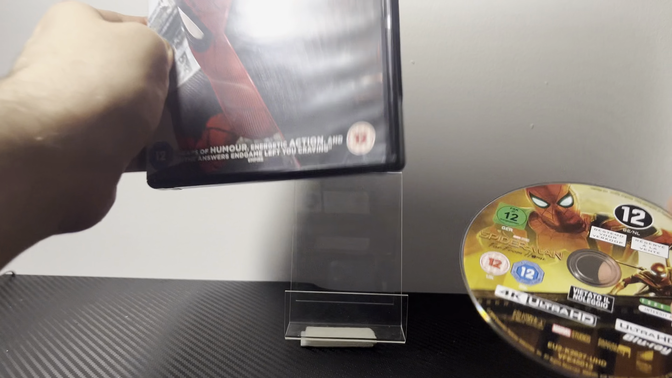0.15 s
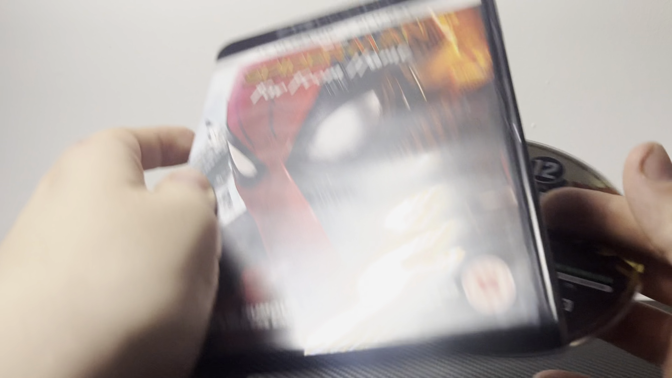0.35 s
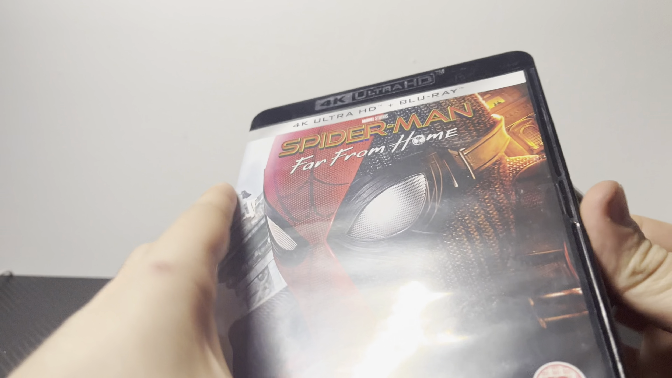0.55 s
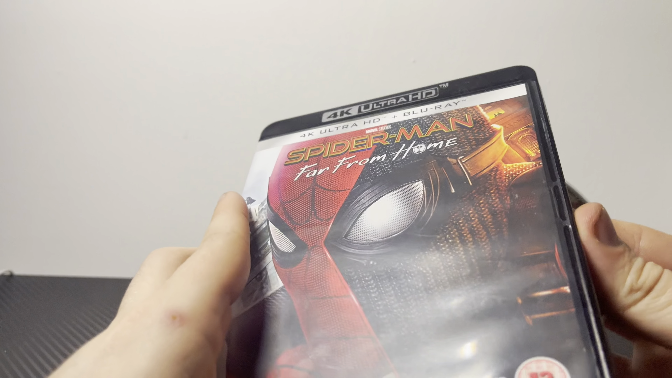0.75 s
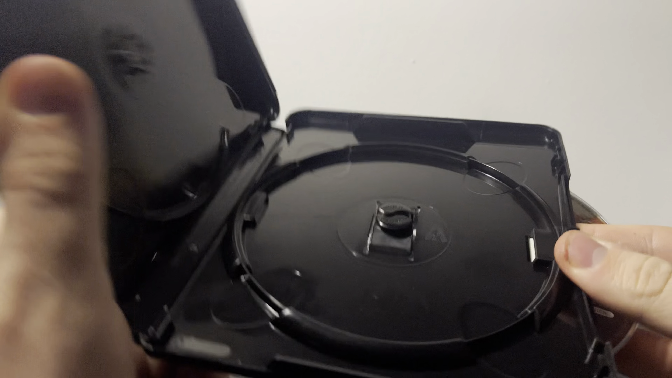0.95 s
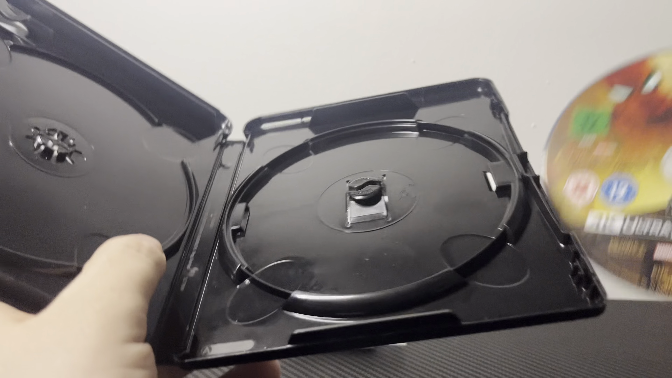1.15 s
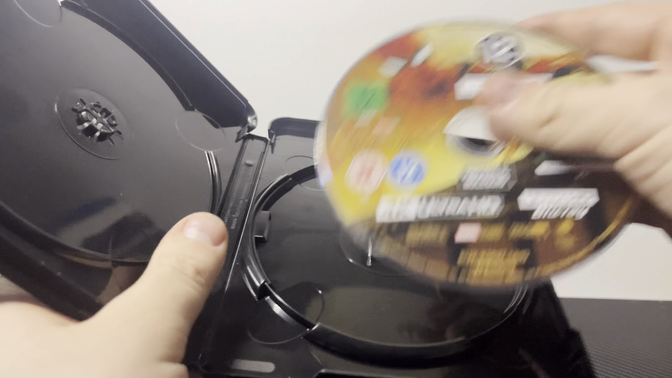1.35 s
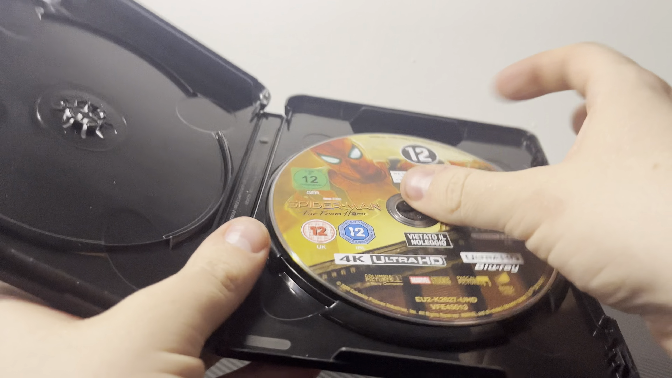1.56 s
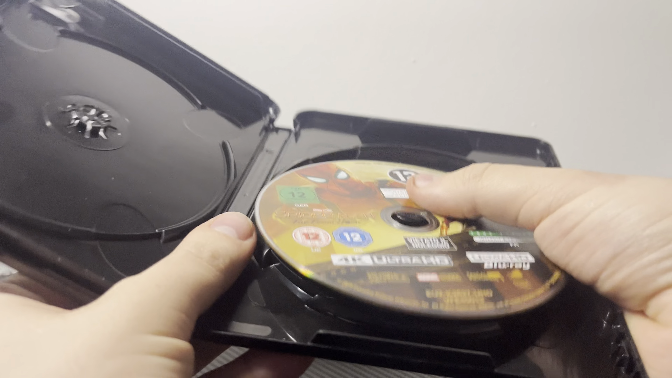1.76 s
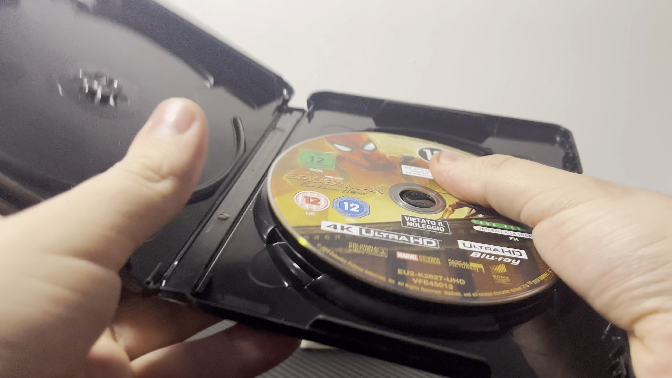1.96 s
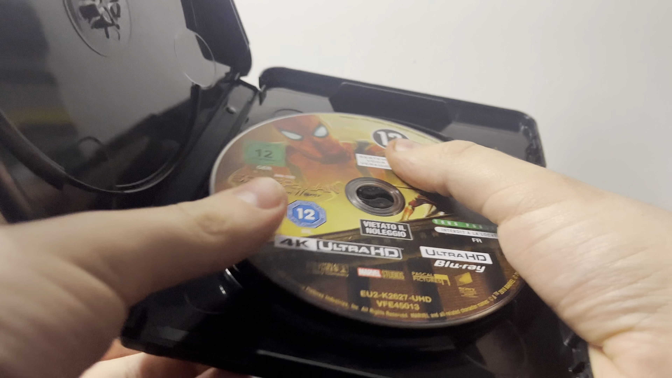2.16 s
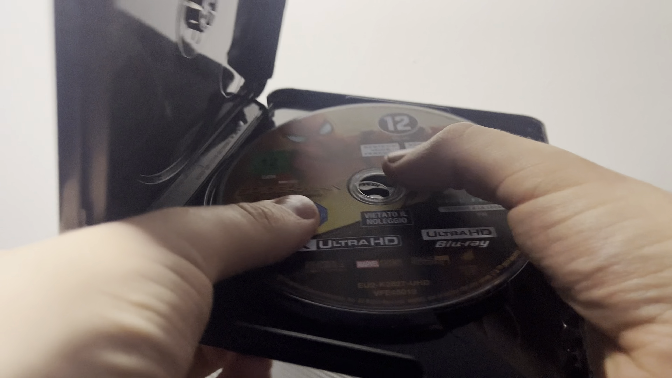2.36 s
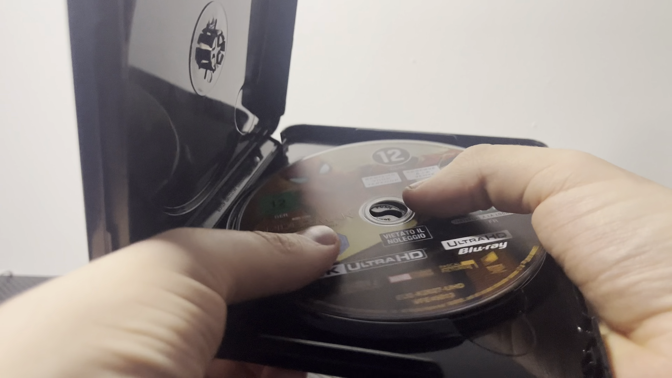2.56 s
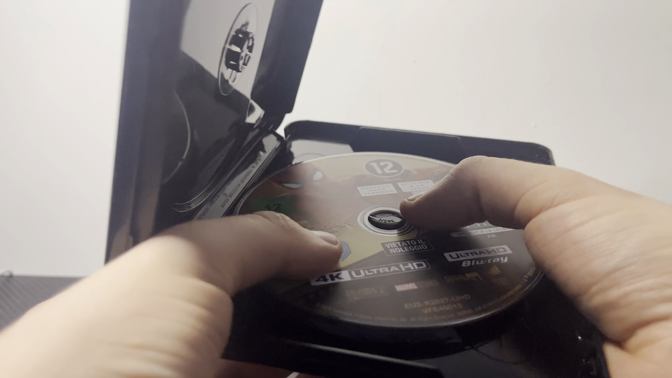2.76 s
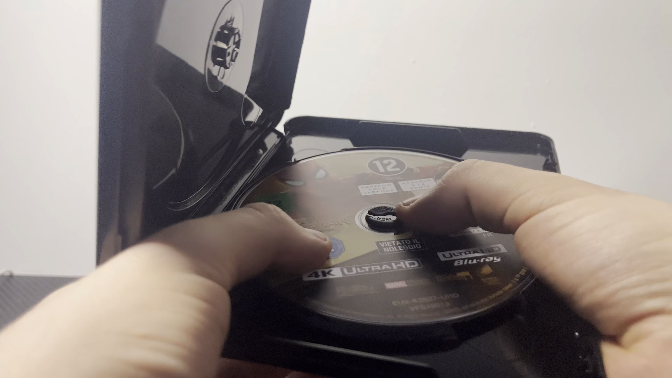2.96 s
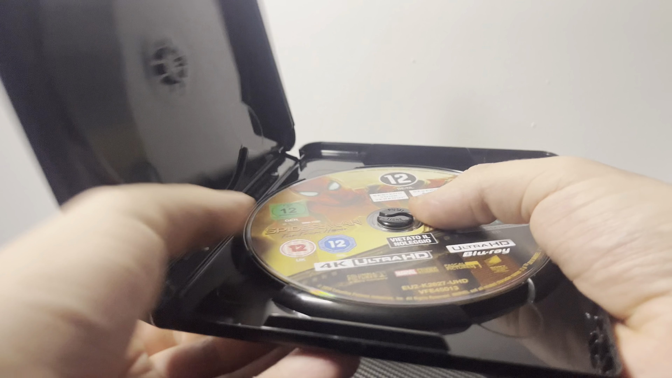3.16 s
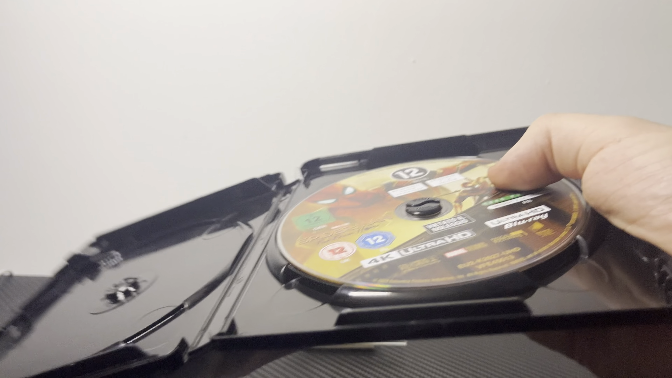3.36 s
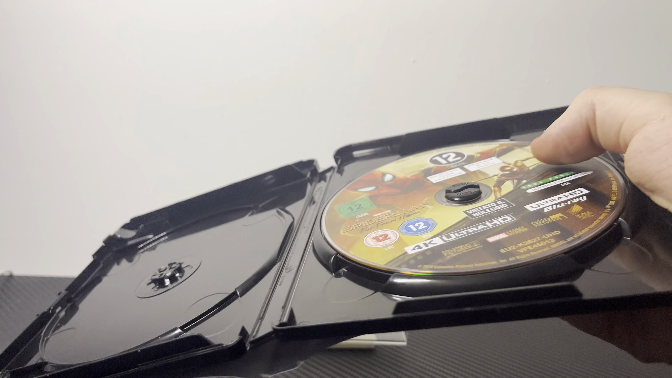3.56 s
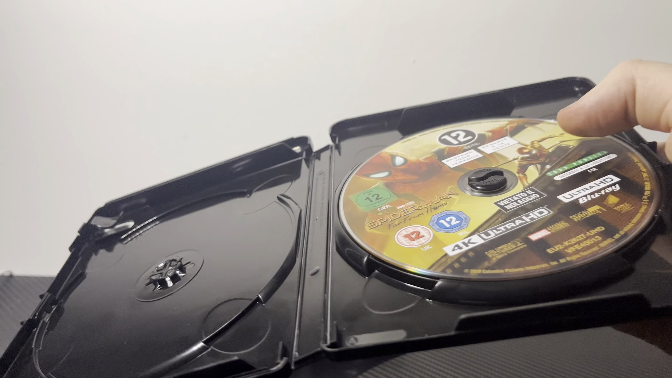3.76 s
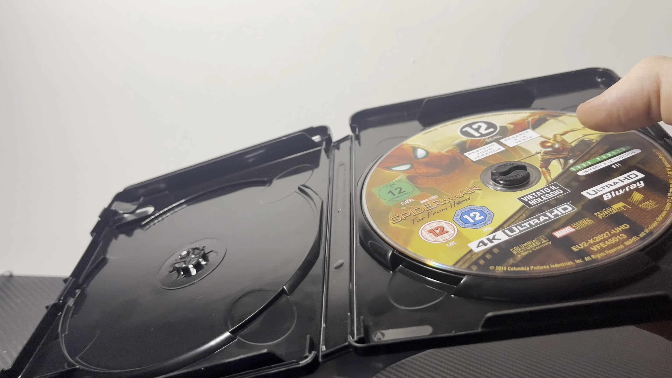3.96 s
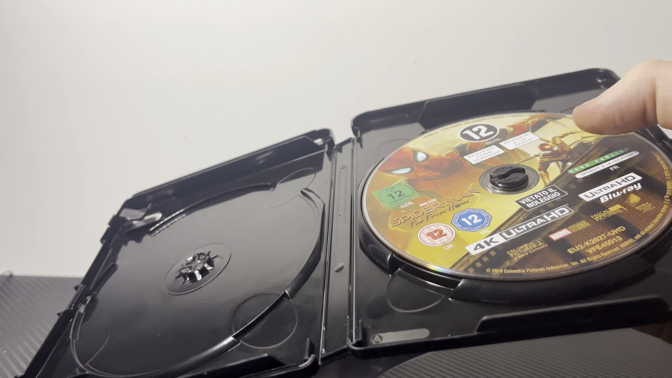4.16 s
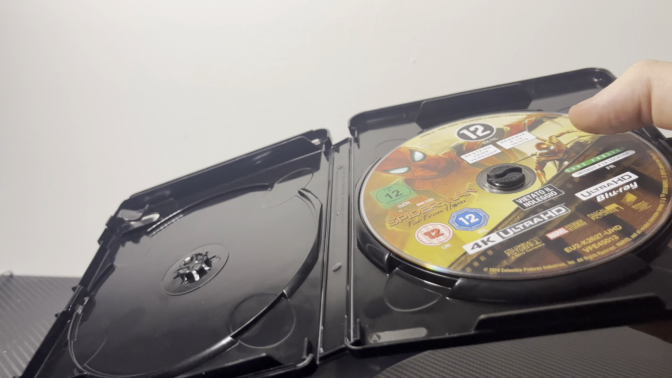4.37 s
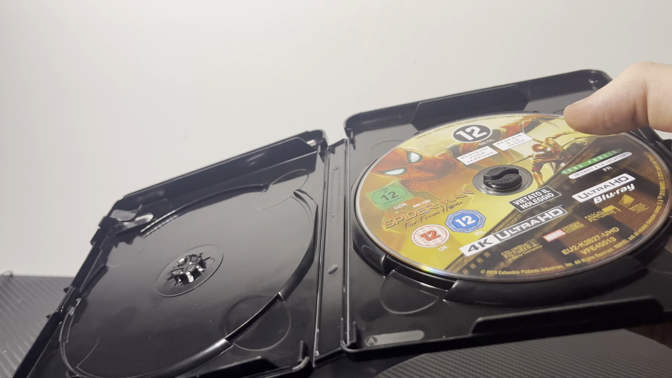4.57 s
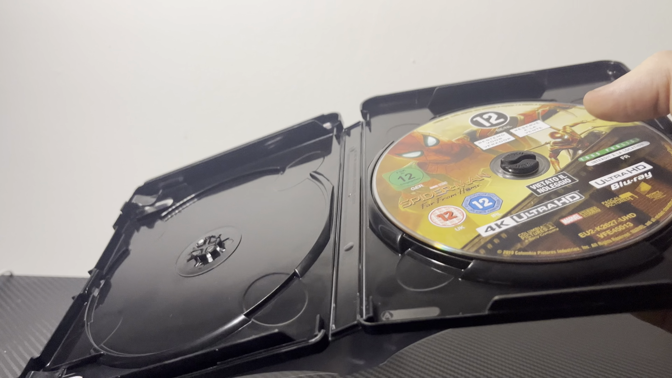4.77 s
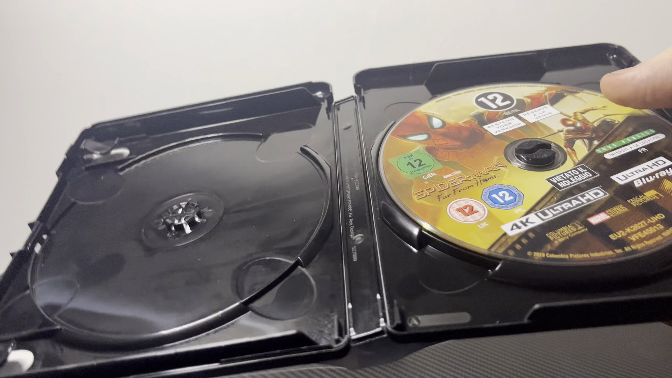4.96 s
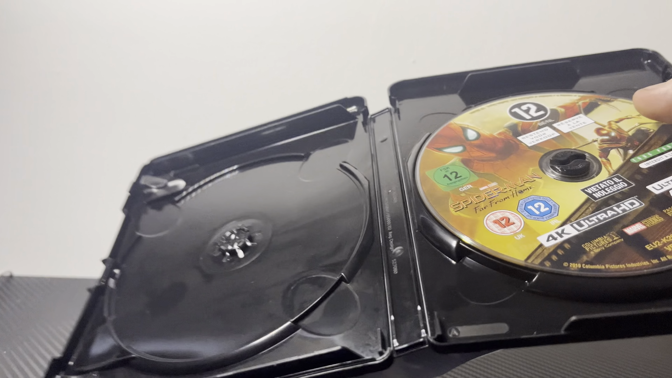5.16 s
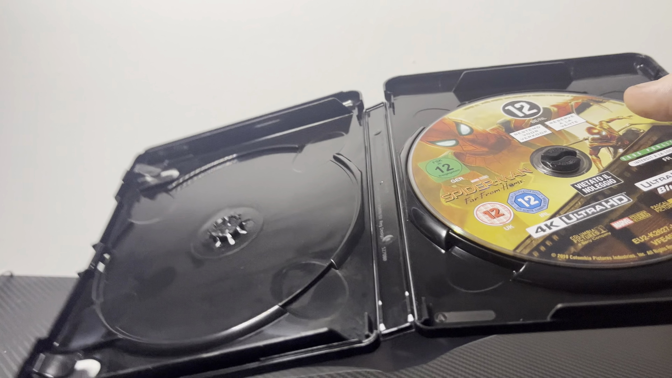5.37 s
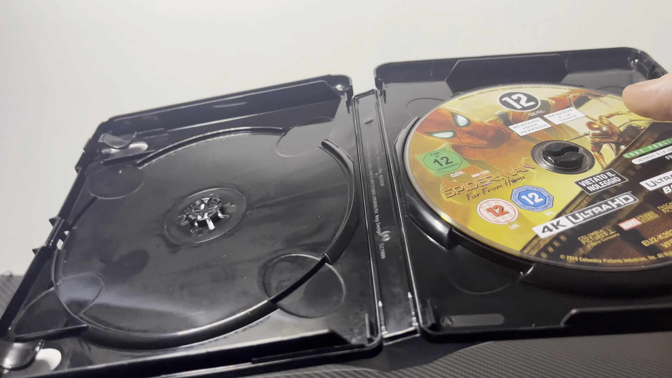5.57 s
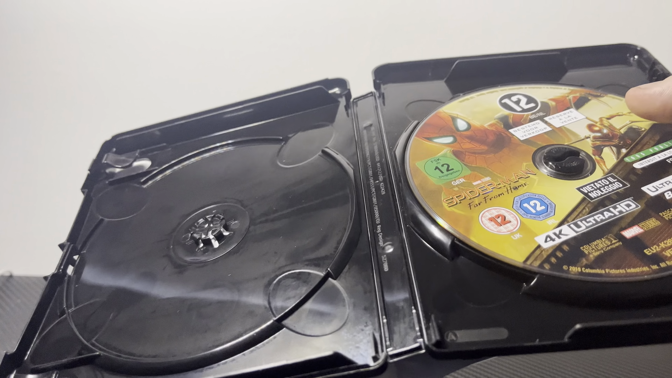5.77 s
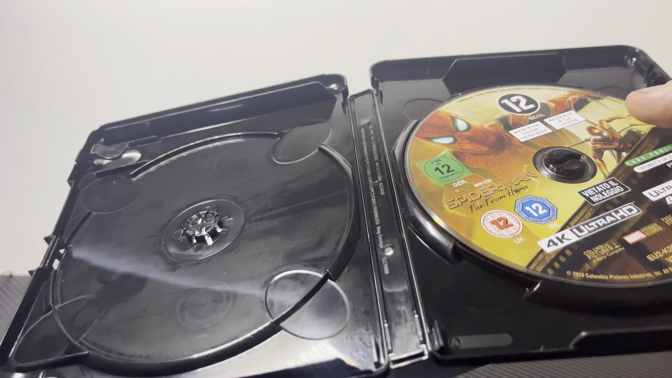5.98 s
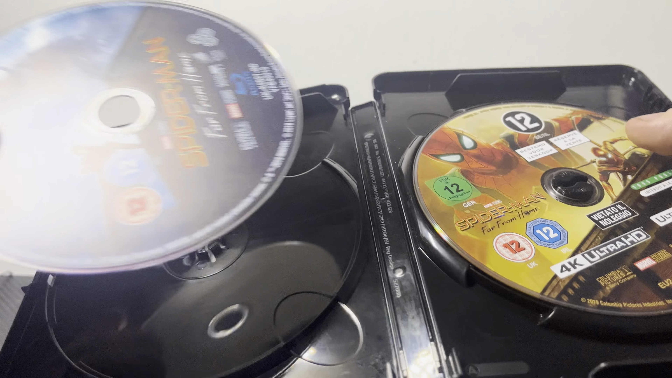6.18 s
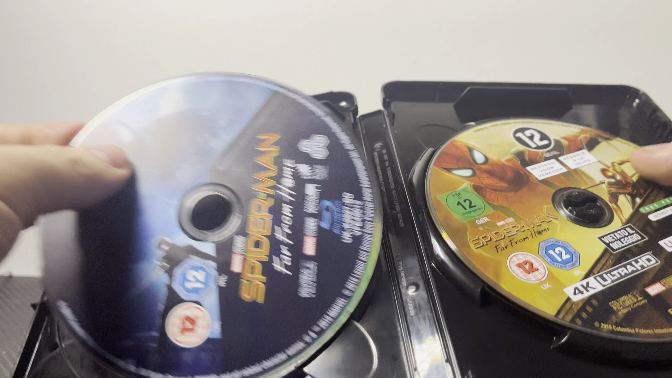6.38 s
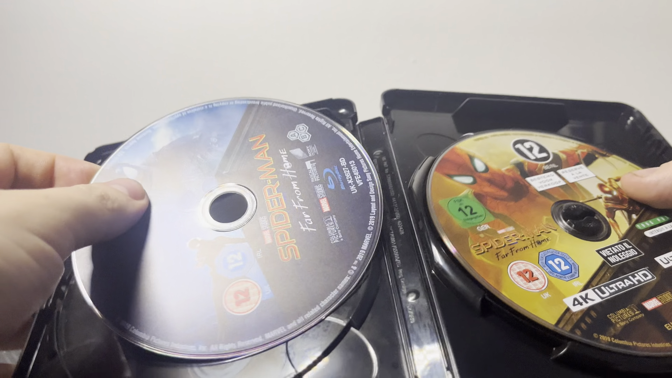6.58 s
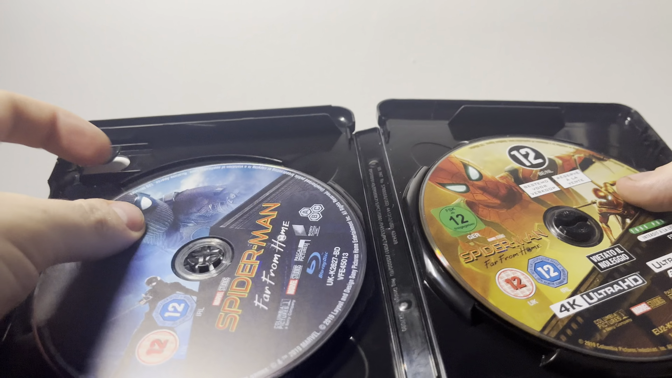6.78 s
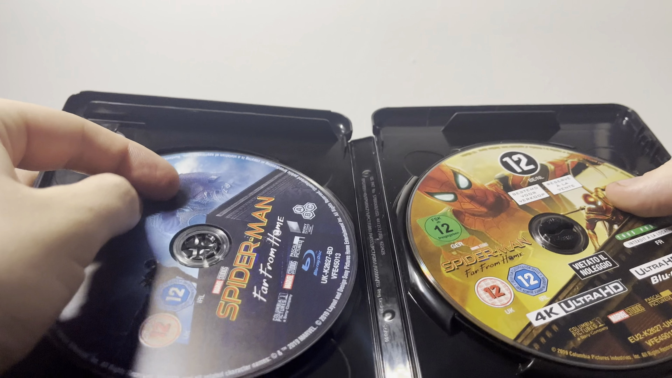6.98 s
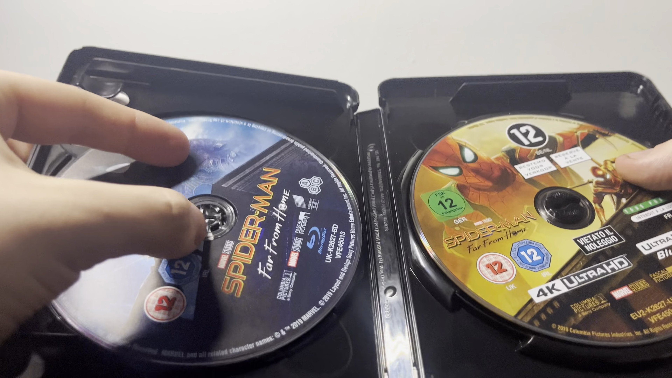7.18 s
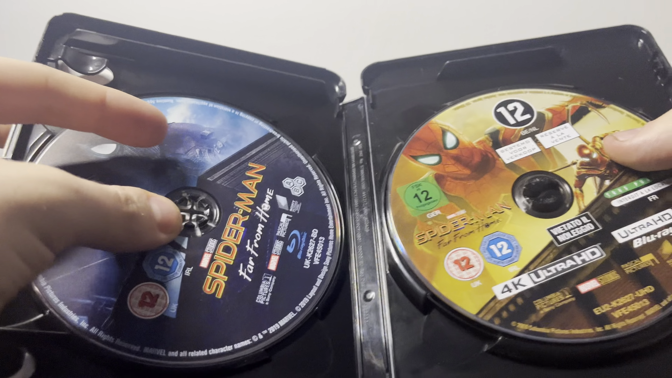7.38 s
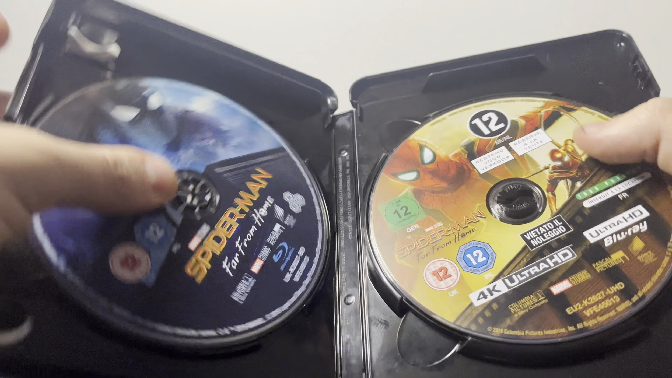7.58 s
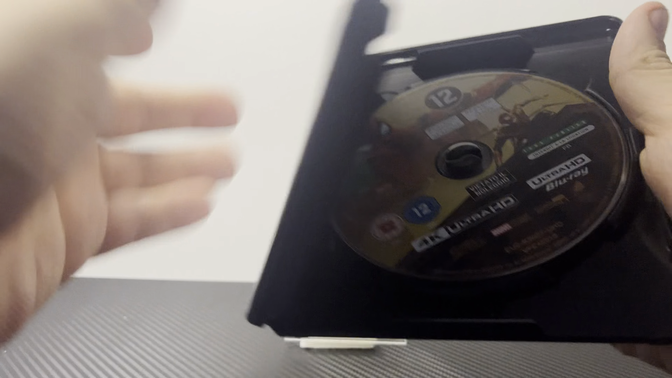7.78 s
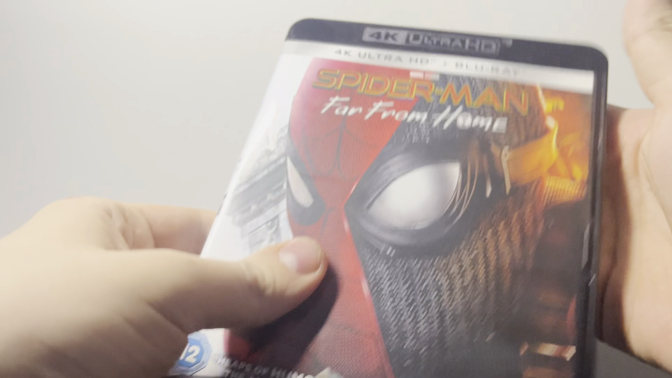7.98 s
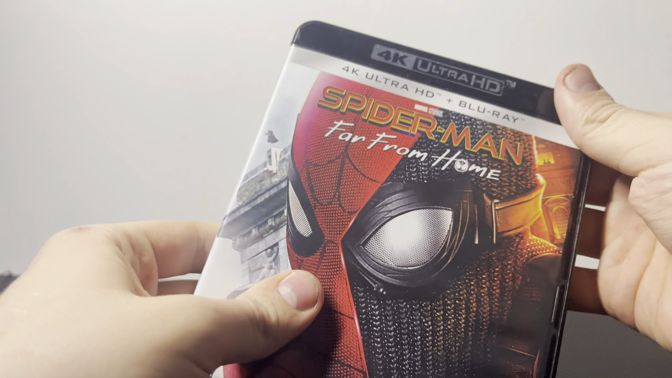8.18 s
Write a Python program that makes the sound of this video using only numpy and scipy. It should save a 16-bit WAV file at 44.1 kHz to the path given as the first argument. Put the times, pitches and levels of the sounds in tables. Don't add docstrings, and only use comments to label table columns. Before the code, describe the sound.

Close dry clicks, cracks and knocks of a plastic case being handled, with rustling fingers and low bumps over a faint room hum.

```python
import sys
import numpy as np
from scipy import signal
from scipy.fft import rfft, irfft, next_fast_len
from scipy.io import wavfile
from scipy.ndimage import uniform_filter1d

SR = 44100
rng = np.random.default_rng(int(sys.argv[2]) if len(sys.argv) > 2 else 0)


def persist_wave(psi):
    counts = np.round(np.clip(psi, -1, 1) * 32767).astype(np.int16)
    wavfile.write(sys.argv[1], SR, np.atleast_2d(counts).T)


def gain_from_db(level_db):
    decades = np.asarray(level_db, float) / 20
    return 10 ** decades


N = 363031


def evened(x):
    return x / np.sqrt(np.mean(x ** 2) + 1e-20)


def peaked(x):
    return x / abs(x).max()


def wander(count, smoothing):
    return evened(uniform_filter1d(rng.standard_normal(count), smoothing))


def read(points, hz):
    f, value = np.transpose(points)
    return np.interp(np.log(hz + 1), np.log(f + 1), value)


def colour(x, gain):
    size = next_fast_len(N + 4096)
    return irfft(rfft(x, size) * gain(np.fft.rfftfreq(size, 1 / SR)), size)[..., :N]


def add(mix, s, sound):
    part = mix[:, round(s * SR):][:, :sound.shape[1]]
    part += sound[:, :part.shape[1]]


# [f/Hz, level/dB]
AIR = [(15, -42), (25, 15.5), (107, 6), (278, -5), (448, -1.5), (525, -17.5), (649, -2), (916, -13),
       (1560, -19), (2140, -31), (5690, -51), (14000, -54)]
# [f/Hz, likeness/-1..1]
SAME = [(60, 0.78), (240, 0.69), (950, -0.62), (3770, -0.57), (15000, 0.25)]
# [f/Hz, level/dB]
HUM = [(102.3, -75), (366.1, -68), (640.6, -71)]


def air():
    frames, hz = N // 256 + 5, np.fft.rfftfreq(1024, 1 / SR)
    a, b, c, d, patches = rng.standard_normal((frames, 513, 5)).T
    patches = uniform_filter1d(patches, 8, 0)
    patches = evened(uniform_filter1d(patches, 14, 1))
    same = np.clip(read(SAME, hz), -1, 1)[:, None]
    left = a + 1j * b
    right = same * left + np.sqrt(1 - same ** 2) * (c + 1j * d)
    z = np.array([left, right]) * gain_from_db(read(AIR, hz)[:, None] + 2.4 * patches)
    noise = signal.istft(z, nperseg=1024, noverlap=768)[1][:, :N]
    out = gain_from_db(-46) * evened(noise)
    for f, db in HUM:
        waver = wander(N, 6000)
        turns = np.cumsum(f + 6.6 * waver) / SR
        out = out + gain_from_db(db + 4.5 + 0.83 * waver) * np.sin(2 * np.pi * turns)
    return out


# [t/s, level/dB, f/Hz]
WOBBLES = [
    (0.431, -30.5, 50.8),
    (5.19, -37.5, 100),
]


def wobbles():
    out, t = np.zeros((2, N)), np.arange(12000) / SR
    for s, db, hz in WOBBLES:
        swing = gain_from_db(db - 60 * t / 0.89) * np.sin(2 * np.pi * hz * t)
        add(out, s, swing[None])
    return out


# [t/s, level/dB, first f/Hz, last f/Hz, t60/s]
THUDS = [(1.527, -30, 500, 150, 0.069), (1.945, -28.5, 603, 200, 0.049), (3.729, -38.5, 452, 200, 0.091),
         (3.875, -42, 301, 120, .08), (3.954, -36, 600, 149, 0.074), (5.757, -32, 496, 151.5, .06),
         (6.411, -20, 919, 692, 0.039), (7.311, -13, 420, 140, .07), (7.364, -18, 330, 135, 0.065),
         (7.858, -37, 295, 150, .08), (7.976, -25, 303, 150, 0.075)]


def thuds():
    out, t = np.zeros((2, N)), np.arange(4000) / SR
    sink_s, rise_s = 0.0116, 0.0025
    for s, db, first_hz, last_hz, t60 in THUDS:
        turns = np.cumsum(last_hz + (first_hz - last_hz) * np.exp(-t / sink_s)) / SR
        swell = gain_from_db(db - 60 * t / t60) * (1 - np.exp(-t / rise_s))
        add(out, s, (swell * np.sin(2 * np.pi * turns))[None])
    return out


def slips(count, share, spread_db, luck):
    size = gain_from_db(spread_db * np.minimum(luck.exponential(1, count), 4))
    return luck.standard_normal(count) * size * (luck.random(count) < share)


def below_db(start, hold, swell_db, fade_db):
    t = np.arange(0, N, 100) / SR - np.reshape(start, (-1, 1))
    past_hold = t - np.reshape(hold, (-1, 1))
    return np.maximum(np.maximum(-swell_db * t, fade_db * past_hold), 0)


def loudest(peak_db, under_db, rest_db):
    level = np.maximum((np.reshape(peak_db, (-1, 1)) - under_db).max(0), rest_db)
    return np.repeat(level, 100)[:N]


def layer(x, shape, db):
    return gain_from_db(db) * evened(colour(x, lambda hz: gain_from_db(read(shape, hz))))


# [f/Hz, level/dB per Hz]
RUB = [(300, -17.5), (800, 14), (1500, 3.5), (3500, -2), (4800, -1), (8000, -22.5), (11000, -23)]
# [f/Hz, level/dB per Hz]
DRY = [(5000, -46), (8000, 4.5), (10500, 4.5), (13000, 10.5), (15500, -13.5)]
# [f/Hz, level/dB per Hz]
WEIGHT = [(30, -9), (60, 10.5), (110, 5.5), (250, -3), (500, -11.5), (1000, -51)]
# [t/s, hold/s, rub level/dB, fizz level over the rub/dB]
RUBS = [(0, 0.011, -65, -16), (.1, 0.23, -70.5, -15.5), (0.497, 0.012, -60, -15), (0.853, 0.093, -61, -12),
        (1.057, 0.041, -58.5, -12), (1.324, 0.013, -77, 2), (1.483, 0.033, -53, -10.5),
        (1.613, 0.25, -57, -22), (1.9, .01, -53, -19), (2.25, 0.09, -50, -15), (2.617, 0.015, -50, -24),
        (2.752, 0.19, -67, -34), (2.967, 0.0069, -50, -19), (3.217, 0.0068, -52.5, -17),
        (3.494, .1, -66.5, -31), (3.786, 0.1, -52.5, -30), (3.992, 0.17, -63.5, -22.5),
        (4.509, 0.099, -50.5, -23.5), (4.892, 0.049, -48, -24), (4.985, 0.064, -47, -40),
        (5.355, 0.0087, -52.5, -24), (5.6, .01, -51.5, -22), (5.849, 0.12, -61, -14.5),
        (6.078, 0.066, -69, -23.5), (6.39, 0.012, -61, -5), (6.5, 0.085, -59, -24), (6.75, .03, -56.5, -12),
        (6.878, 0.085, -65, -12), (7.377, .01, -54, -17.5), (7.618, 0.012, -54, -18), (8, 0.0067, -48, -17),
        (8.125, .1, -72, -29)]
# [t/s, hold/s, level/dB]
LEANS = [(0, 0.019, -44), (0.39, 0.15, -47), (0.79, 0.42, -45.5), (1.496, .01, -42.5), (2.255, 0.14, -39.5),
         (2.499, 0.51, -50), (3.13, 0.13, -43), (3.979, 0.015, -33.5), (5.004, 0.014, -30),
         (5.204, 0.058, -34), (5.638, 0.011, -40), (5.875, .1, -52), (6.384, 0.071, -54),
         (7.373, 0.0076, -48.5), (7.626, 0.0086, -40), (7.918, 0.099, -36.5)]


def hands():
    start, hold, db, fizz_db = np.transpose(RUBS)
    under_db = below_db(start, hold, swell_db=105.5, fade_db=77.5)
    rub_db = loudest(db, under_db, rest_db=-79)
    dry_db = loudest(db + fizz_db, 1.6 * under_db, rest_db=-99)
    start, hold, db = np.transpose(LEANS)
    weight_db = loudest(db, below_db(start, hold, swell_db=86.5, fade_db=105), rest_db=-58)

    clumps = gain_from_db(2.5 * wander(N, 900))
    grains = evened(slips(N, 0.02, 2.5, rng))
    hiss = rng.standard_normal((2, N))
    skin = clumps * (.45 * grains + .85 * hiss)
    bumps = gain_from_db(3.5 * wander(N, 2500)) * rng.standard_normal(N)
    rustle = layer(skin, RUB, rub_db - 4.0) + layer(skin, DRY, dry_db + 3.5)
    return rustle, layer(bumps, WEIGHT, weight_db - 3.0)


def patchy(x):
    z = signal.stft(x, nperseg=256)[2]
    patches = uniform_filter1d(rng.standard_normal(z.shape[:0:-1]), size=12, axis=0)
    patches = evened(uniform_filter1d(patches, size=3, axis=1)).T
    return signal.istft(z * gain_from_db(3.0 * patches - 1.0), nperseg=256)[1][:, :N]


# [t/s, top f/Hz, level/dB]
SQUEAKS = [
    (5.108, 10800, -78),
]


def squeaks():
    length_s, sag_hz = 0.18, 1900
    out, u = np.zeros((2, N)), np.arange(-1, 1, 2 / (length_s * SR))
    for s, top_hz, db in SQUEAKS:
        turns = np.cumsum(top_hz - sag_hz * u ** 2) / SR
        whistle = np.sqrt(1 - u ** 2) * np.sin(2 * np.pi * turns)
        add(out, s, gain_from_db(db) * whistle[None])
    return out


# [t/s, length/s, first f/Hz, last f/Hz, level/dB]
GLIDES = [
    (0, 0.038, 11700, 11050, -70),
    (.03, .09, 10950, 11000, -84),
    (0.117, 0.11, 10950, 9000, -86),
    (0.103, 0.071, 2730, 2820, -72),
    (0.28, 0.081, 3630, 3570, -70.5),
    (3.375, 0.067, 4920, 4750, -71.5),
    (3.559, 0.08, 3560, 3520, -78.5),
]


def glides():
    out = np.zeros((2, N))
    for s, length, first_hz, last_hz, db in GLIDES:
        u = np.arange(6000) / (SR * length)
        hz = first_hz + (last_hz - first_hz) * u + 150 * wander(6000, 120)
        swell = np.clip(4 * np.minimum(u + .05, 1 - u), 0, 1)
        squeal = swell * np.sin(2 * np.pi * np.cumsum(hz) / SR)
        add(out, s, gain_from_db(db) * squeal[None])
    return out


# [f/Hz, level/dB]
PANELS = [(350, -46), (800, -15), (1500, -5), (2200, 0.5), (4500, 10.5), (6500, 4), (9000, -29.5)]


def struck(force, hz, tick_db, luck):
    t = np.arange(1200) / SR
    spread = (np.arange(36) + luck.random(36)) / 36
    f = np.append(350 * (9000 / 350) ** spread, hz)[:, None]
    chance_db = np.append(3.0 * luck.standard_normal(36), 6000 / hz + 1.5)[:, None]
    octaves = np.log2(f / hz)
    above_db = np.clip(0.32 * (tick_db + 16) - 7.5, -18, -8)
    near_db = np.where(octaves > 0, above_db, -4.5) * abs(octaves)
    ring_s = np.clip(.0005 + 13 / f, .002, .018) * np.where(f == hz, 2.2, 1)
    fading = gain_from_db(read(PANELS, f) + chance_db + near_db - 60 * t / ring_s)
    apart = 2.2 * luck.standard_normal(f.shape) * np.clip(f / 450, 0, 1) * (f != hz)
    body = np.array([(fading * np.sin(2 * np.pi * f * t + lag)).sum(0) for lag in (-apart / 2, apart / 2)])

    tick_fade = gain_from_db(-60 * t / .0015)
    tick = tick_fade * np.sin(2 * np.pi * luck.uniform(10500, 12500) * t)
    tick = tick + .4 * np.diff(tick_fade * luck.standard_normal(len(t)), prepend=0)
    ringing = peaked(signal.fftconvolve(force[None], body, axes=1))
    return ringing + gain_from_db(tick_db + 9) * peaked(signal.fftconvolve(force, tick))


def scrape(db, hz, tick_db, length, luck):
    u = np.arange(6000) / (SR * np.clip(length, .01, .13))
    stroke = np.clip(u / 0.27, 0, 1) * np.clip((1 - u) / 0.66, 0, 1)
    stroke = stroke * gain_from_db(4.5 * wander(len(u), 150))
    return gain_from_db(db) * struck(slips(len(u), 0.23, 3.85, luck) * stroke, hz, tick_db, luck)


LEAD_IN_S = .008


def click(db, hz, thump_db, tick_db, length, luck):
    early = round(LEAD_IN_S * SR)
    t = np.arange(-early, 2000) / SR
    u = np.clip(t / np.clip(2.6 * length, .0006, .03), 0, 1)
    lead_in = gain_from_db(-27 + 16 * t / LEAD_IN_S)
    run = np.minimum(.2 + t / .001, 1) * (1 - u) ** 1.8
    rattle = gain_from_db(-30 - 60 * t / .06)
    force = slips(len(t), .2, 2.5, luck) * np.where(t < 0, lead_in, run + rattle)
    force[early + 40] = 2.0

    t = np.maximum(np.arange(-early, 3199) / SR, 0)
    low_hz = np.array([[120], [200], [330]]) * luck.uniform(.8, 1.25, (3, 1))
    swell = gain_from_db(-60 * t / 0.061) * (1 - np.exp(-t / 0.0047))
    thump = (swell * np.sin(2 * np.pi * low_hz * t)).sum(0)
    return gain_from_db(db) * (struck(force, hz, tick_db, luck) + gain_from_db(thump_db - 6.0) * peaked(thump))


# [t/s, peak level/dB, f/Hz, tick level/dB]
BUMPS = [(0.423, -37, 910, -5), (0.663, -45.5, 1140, -24), (0.788, -40, 1070, -56), (1.2188, -77, 643, -19),
         (3.6367, -47, 637, -28), (3.867, -37.5, 754, -54), (3.9541, -28.5, 2645, -25),
         (4.9662, -29, 500, -30), (4.996, -32, 778, -28), (5.0157, -26, 450, -32), (5.3847, -39, 1800, -34),
         (6.7092, -43, 691, 10), (7.1385, -51.5, 702, -11), (7.853, -42, 1180, -4.5),
         (7.8643, -36, 946, -14)]
KNOCKS = [(.6858, -38.5, 787, -44), (1.0019, -35.5, 5530, -1), (1.0898, -42, 1400, -14),
          (1.578, -29.5, 1180, -36), (1.8155, -33.5, 610, -10.5), (1.8406, -33.5, 2500, -22),
          (1.9332, -26, 2880, -25), (2.8089, -30.5, 2930, -11.5), (4.43, -36, 655, -19),
          (4.9361, -24.5, 4180, -13), (5.304, -37.5, 1730, -44), (5.4205, -30.5, 4700, -18),
          (5.4443, -37, 4500, -37), (5.5418, -25, 3600, -22), (5.6031, -29.5, 3300, -22),
          (6.328, -17.5, 927, -9), (6.4648, -30.5, 1700, -7), (6.5806, -43, 2950, -31),
          (6.6349, -39.5, 910, -14), (6.723, -18.5, 3200, -10.5), (6.8297, -27, 987, -4.5),
          (6.8578, -35, 1430, -10), (7.3106, -12, 4160, -7.5), (7.5692, -39.5, 2140, -8.5),
          (7.665, -35, 890, -43)]
TAPS = [(.463, -35.5, 840, -28), (1.528, -14.5, 3440, -12), (1.535, -25.5, 3200, -13),
        (1.6327, -30, 2530, -13), (1.7597, -27, 850, -15.5), (1.7809, -23, 3400, -11.5),
        (1.946, -17, 2000, -18.5), (2.2045, -33.5, 2670, -14), (2.232, -27, 4300, -7.5),
        (2.6141, -25.5, 3240, -18.5), (2.6445, -29.5, 3000, -30), (2.9108, -15, 1200, -11),
        (3.3293, -46.5, 2510, -30), (4.2926, -42, 826, -76), (4.835, -8.5, 3900, -41),
        (5.2652, -39, 900, -41), (5.5209, -25.5, 3500, -22), (5.7567, -22, 1484, -16),
        (6.3524, -34, 920, -12.5), (6.5566, -44, 650, -4), (7.0179, -45.5, 726, -10.5),
        (7.1854, -35, 948, -16.5), (7.3668, -9, 1890, -20), (7.942, -12, 1205, -32),
        (7.9514, -12, 2330, -35), (8.0459, -32, 3600, -23.5)]
SNAPS = [(.536, -57, 595, 4.5), (.8205, -27.5, 1320, -43), (0.837, -32, 1840, -17),
         (1.4321, -18, 3170, -13), (1.481, -19, 900, -19), (1.6015, -31.5, 3060, -13),
         (1.6441, -30.5, 620, -30), (1.7495, -27.5, 1300, -17), (2.301, -23.5, 1160, -3.5),
         (2.343, -20.5, 3040, -10), (2.8622, -40, 746, -31), (2.9242, -6, 2800, -17),
         (4.58, -25.5, 1460, -68.5), (4.602, -28.5, 1170, -25), (4.6766, -24.5, 840, -14),
         (4.6916, -26, 780, -19), (4.8605, -21, 1570, -22), (6.4097, -15, 1410, -37),
         (8.0967, -34, 1250, -21)]
CREAKS = [(0.5504, -45.5, 855, -10), (2.1274, -39.5, 3850, -32), (2.5337, -39.5, 3280, -8),
          (2.599, -40, 3100, -15.5), (2.8164, -30.5, 2890, -41.5), (3.7275, -33, 3420, -37.5),
          (4.3956, -40.5, 1058, -75.5), (5.953, -43.5, 2190, -12), (7.302, -32, 3055, -16.5),
          (7.3585, -18, 1700, -23), (7.976, -24.5, 1160, -8.5), (8.1495, -32.5, 940, -22)]
# [thump level/dB, run of slips/s]
KINDS = [
    (6, 0.0058),
    (-5, 0.0032),
    (-14.5, 0.0027),
    (-23.5, 0.0031),
    (-25.5, 0.01),
]
# [t/s, peak level/dB, strongest panel f/Hz, tick level/dB, length/s]
SCRAPES = [(.778, -35, 1075, -56, 0.062), (.97, -33, 4800, -5.5, 0.09), (1.53, -35, 3500, -25, 0.068),
           (2.13, -46.5, 3600, -1.5, 0.12), (3.135, -48, 2980, -3.5, 0.054), (3.182, -29.5, 4670, -8, 0.11),
           (3.951, -26, 5120, -28, 0.035), (4.808, -30.5, 1150, -58.5, 0.12),
           (5.025, -29, 3360, -41, 0.084), (6.335, -33, 2920, -18, 0.037), (6.42, -34, 2040, -32, 0.08),
           (6.7, -25, 2040, -6, 0.055), (7.318, -25, 3450, -11, 0.017), (7.87, -37.5, 2460, -8, 0.12),
           (7.955, -29, 1950, -20, 0.053), (4.39, -45.5, 4660, -27, 0.08), (4.51, -56, 2900, -32.5, 0.049),
           (5.12, -41, 1690, -43, 0.021), (5.258, -34.5, 1085, -40, 0.072), (5.377, -33, 1700, -29, .02),
           (5.7, -39.5, 1360, -35, 0.12), (7.637, -42.5, 2540, -19, 0.011),
           (7.745, -43.5, 3050, -30, 0.0081), (7.66, -40.5, 910, -9, 0.025), (4.288, -44, 3490, -35, 0.042),
           (7.855, -36, 1160, -40, 0.042), (8.045, -31.5, 1380, -45, .03), (3.952, -32, 750, -55, .035),
           (3.85, -42, 620, -55, .05), (6.412, -27, 2650, -45, .035), (2.325, -34, 750, -50, .04),
           (1.44, -36, 3700, -30, .035), (1.497, -36, 3200, -35, .03), (1.61, -40, 2200, -35, .025),
           (5.29, -42, 5200, -35, .035), (7.926, -26, 3900, -18, .018), (5.399, -35, 1700, -30, .018),
           (5.378, -35, 3500, -30, .04), (4.669, -32, 4200, -15, .012), (1.505, -38, 3100, -30, .03)]
# [t/s, peak level/dB, strongest panel f/Hz, thump
# level/dB, tick level/dB]
AFTERS = [(.061, -54, 2200, -30, -8), (0.803, -33, 1300, -30, -42), (.846, -41, 1155, -32, -47),
          (1.0035, -35.5, 3950, -30, -25), (2.9148, -13, 3100, -23.5, -14), (2.9269, -4, 3080, -26, -17),
          (2.9299, -10, 2900, -22, -14), (3.375, -64.5, 2670, -31.5, -41), (3.513, -54.5, 2810, -28, -40),
          (3.61, -58, 5450, -29.5, -27), (4.5861, -27.5, 1470, -37, -45), (4.8393, -21, 5500, -16, -22),
          (5.047, -32, 3490, -10, -30), (5.059, -34, 5200, -13, -30), (5.066, -34, 2440, -22, -37),
          (5.08, -37, 1660, -17, -42), (5.2697, -39, 1020, -23.5, -38), (5.395, -38.5, 1680, -21.5, -45),
          (5.761, -29, 885, -16, -29), (6.711, -34, 4000, -18, -7), (6.717, -23.5, 6100, -10, -10),
          (6.735, -22, 5540, -4, -7), (6.744, -32.5, 3030, -15, -10), (7.3136, -15, 3810, -16, -16),
          (7.748, -44, 1110, -20, -40), (7.9525, -14.5, 3860, -22, -40), (8.206, -46, 1200, -29.5, -40),
          (1.5286, -22, 790, -22, -30), (1.538, -29.5, 4450, -22, -18.5), (1.549, -33, 3000, -17, -22),
          (1.566, -32, 2300, 5, -21), (2.2374, -19.5, 3000, -29, -10), (1.956, -31.5, 1220, -22, -25),
          (7.315, -18, 1800, -26, -30), (7.3684, -14, 4220, -22.5, -20), (7.9431, -13, 3900, -18, -40),
          (7.918, -34.5, 3050, -20, -26), (4.181, -61, 5480, -30, -23), (4.213, -53, 5030, -31.5, -25),
          (4.6938, -27, 2440, -21, -28),
          (1.578, -32, 4000, -30, -20), (2.9225, -13, 3000, -30, -20), (4.702, -33, 3700, -30, -25),
           (6.3283, -19, 4700, -30, -10), (6.339, -27, 3600, -25, -15), (6.354, -31, 5000, -25, -10),
           (7.874, -38, 5500, -25, -8), (7.892, -38, 4800, -25, -8), (7.981, -25, 1300, -20, -15),
           (7.998, -30, 1000, -20, -25), (8.016, -35, 2500, -20, -15), (8.034, -36, 5000, -25, -15),
           (5.7575, -24, 5000, -25, -20), (1.9475, -22, 800, -20, -25), (6.4105, -17, 2300, -30, -25),
           (1.4825, -23, 1900, -30, -25), (4.606, -34, 3600, -30, -30)]


def clicks():
    out = np.zeros((2, N))
    blows = []
    for rows, (thump_db, length) in zip((BUMPS, KNOCKS, TAPS, SNAPS, CREAKS), KINDS):
        blows += [(s, db, hz, thump_db, tick_db, length) for s, db, hz, tick_db in rows]
    quick = [(*row, .002) for row in AFTERS]
    for rows, sound, early in ((sorted(blows), click, LEAD_IN_S), (SCRAPES, scrape, 0), (quick, click, LEAD_IN_S)):
        for row, seed in zip(rows, rng.integers(1 << 30, size=200)):
            add(out, row[0] - early, sound(*row[1:], luck=np.random.default_rng(seed)))
    return out


# [f/Hz, t60/s]
ROOM = [(100, 0.25), (1000, 0.18), (4000, 0.19), (10000, 0.095)]


def room(x):
    taps = np.zeros((2, SR // 3))
    starts = np.arange(120, SR // 3 - 20, 20)
    at = starts + rng.integers(0, 20, (2, len(starts)))
    np.put_along_axis(taps, at, rng.choice([-1., 1.], at.shape), 1)
    hz, t, z = signal.stft(taps, SR, nperseg=128)
    tail = signal.istft(z * gain_from_db(-60 * t / read(ROOM, hz)[:, None]), SR, nperseg=128)[1]
    return signal.fftconvolve(x, tail / np.linalg.norm(tail[0]), axes=1)[:, :N]


# [f/Hz, lead/rad]
LEAD = [(200, 0), (2000, 1.0), (7000, 1.7), (8000, 3.1), (9800, 1.5), (11800, 0), (13500, -.9),
        (15000, -2.4)]
# [f/Hz, level/dB]
TILT = [(200, 2.5), (1000, 3.5), (3000, 5.5), (6000, 5), (9000, 1.5), (13000, 0)]
# [f/Hz, share/0..1]
SHARED = [(6500, 0), (8500, .8), (11000, 1)]


def ports(x):
    side = np.array([[.5], [-.5]])
    x = x + [[0], [1]] * colour(x[0] - x[1], lambda hz: read(SHARED, hz))
    return colour(x, lambda hz: gain_from_db(side * read(TILT, hz) + 5.0) * np.exp(1j * side * read(LEAD, hz)))


def scene():
    skin, weight = hands()
    case = clicks() + patchy(skin) + squeaks() + glides()
    echo = gain_from_db(-9.5) * room(case.mean(0)[None])
    through_table = weight * gain_from_db(np.array([[1.0], [-1.0]]))
    return ports(case + echo) + through_table + wobbles() + thuds() + air()


def top_cut(x):
    return signal.sosfilt(signal.butter(12, 16470, fs=SR, output="sos"), x)


# [f/Hz, level/dB]
MIC = [(27, -22.5), (42, -7.5), (5000, 1), (8000, 5.5), (11000, -6), (13500, -12), (14800, -3),
       (16100, -29)]


def record(dry):
    rounded = 1.2 * np.tanh(dry / 1.2)
    mix = colour(rounded, lambda hz: gain_from_db(read(MIC, hz)))
    return top_cut(mix)


dry = scene()
out = record(dry)
persist_wave(out)
```